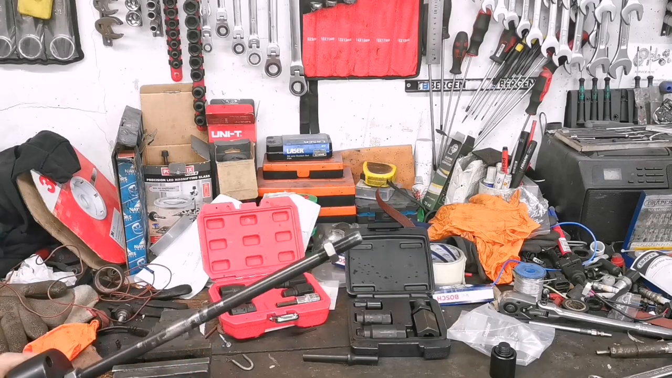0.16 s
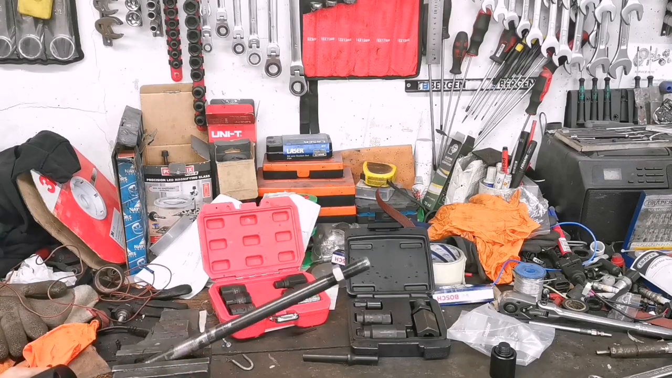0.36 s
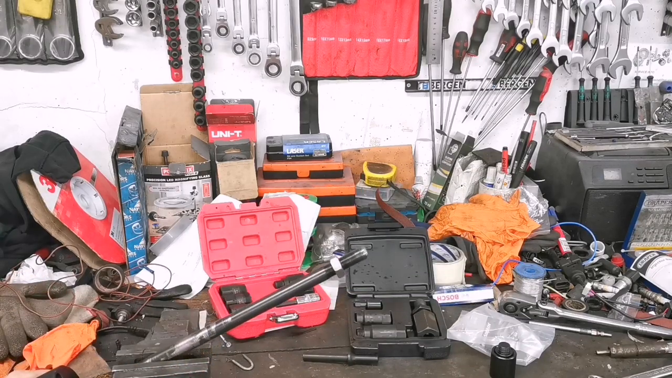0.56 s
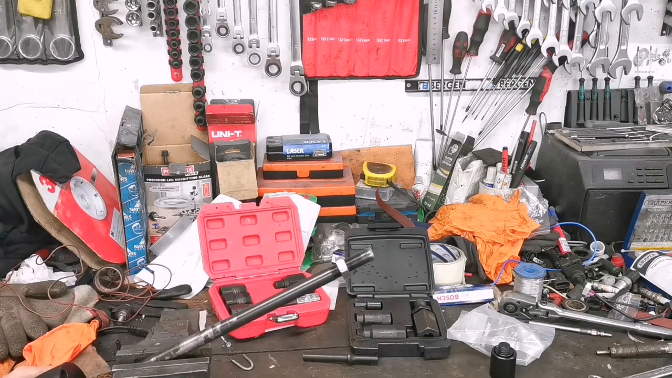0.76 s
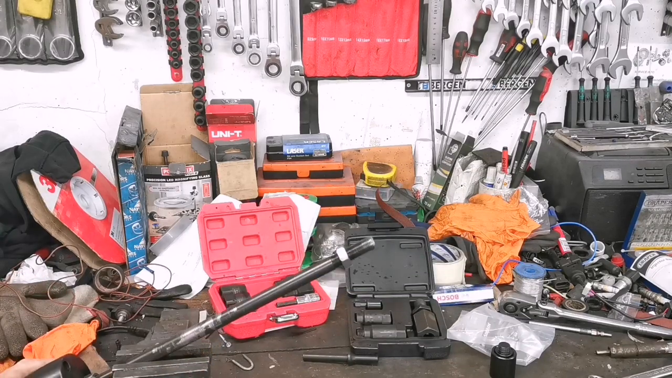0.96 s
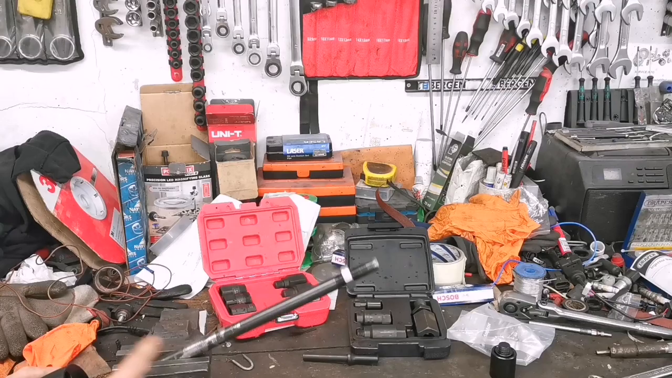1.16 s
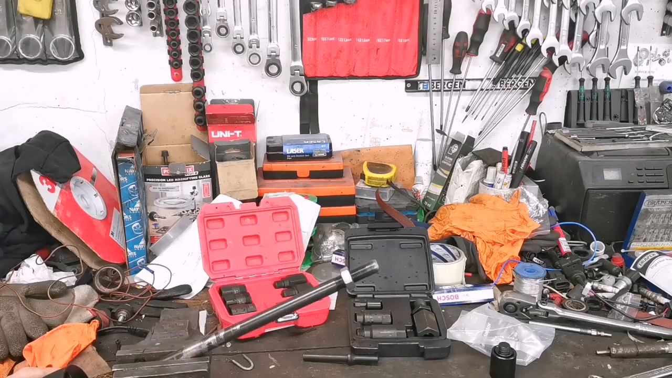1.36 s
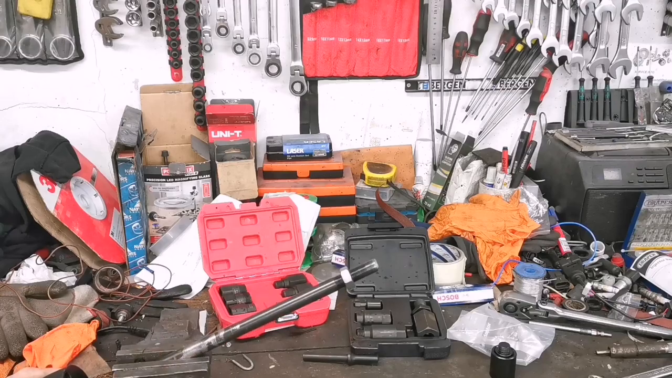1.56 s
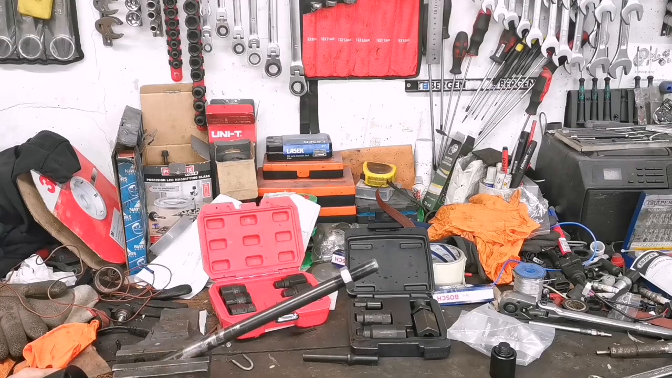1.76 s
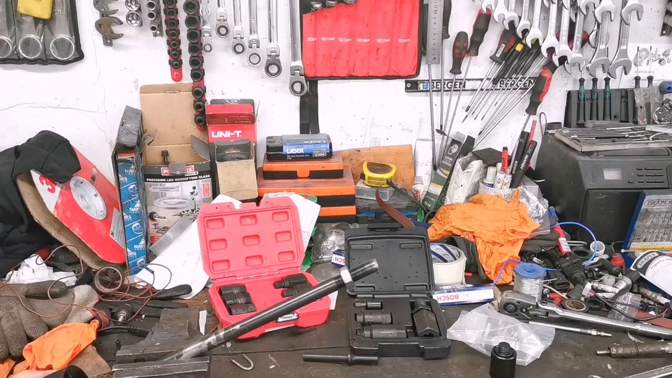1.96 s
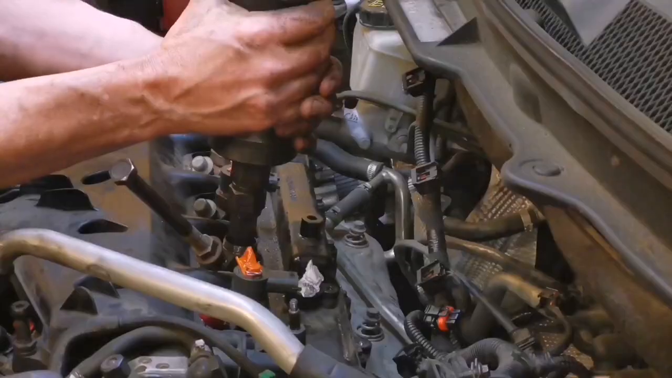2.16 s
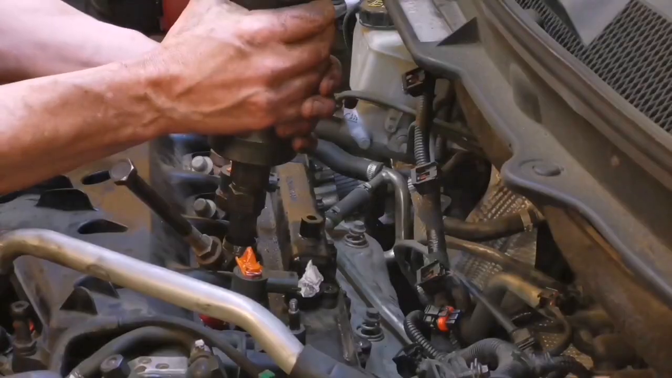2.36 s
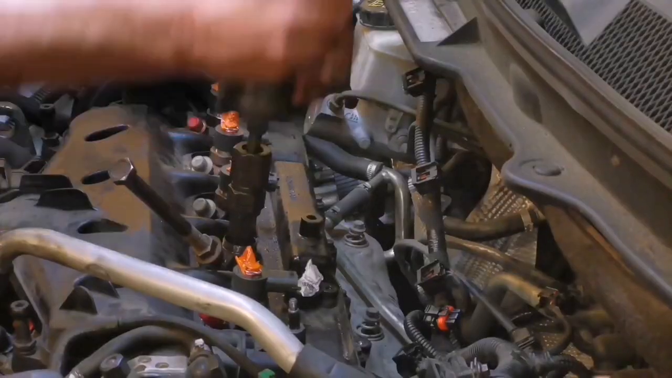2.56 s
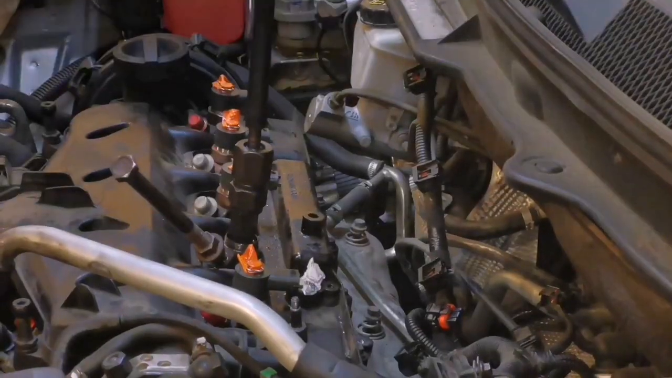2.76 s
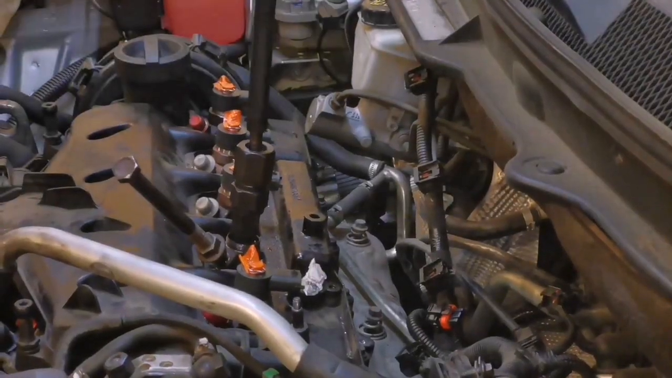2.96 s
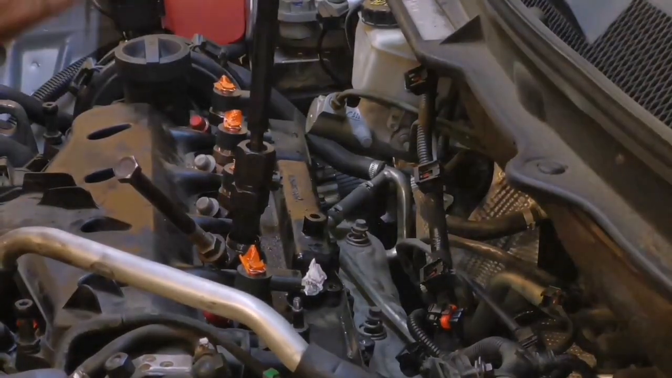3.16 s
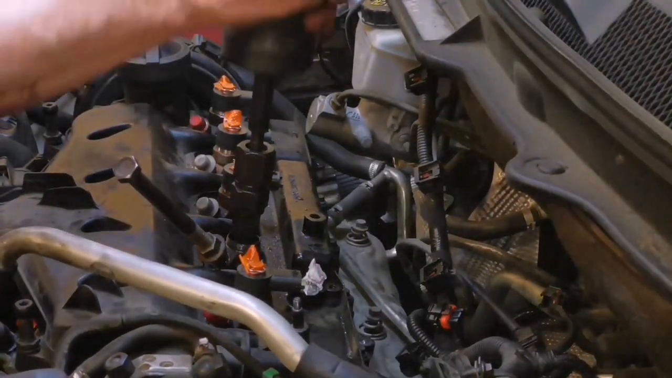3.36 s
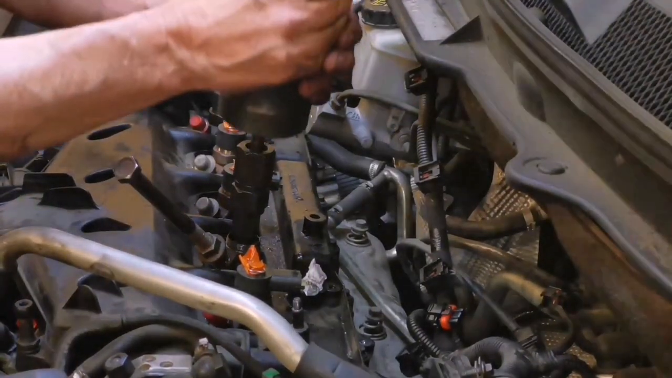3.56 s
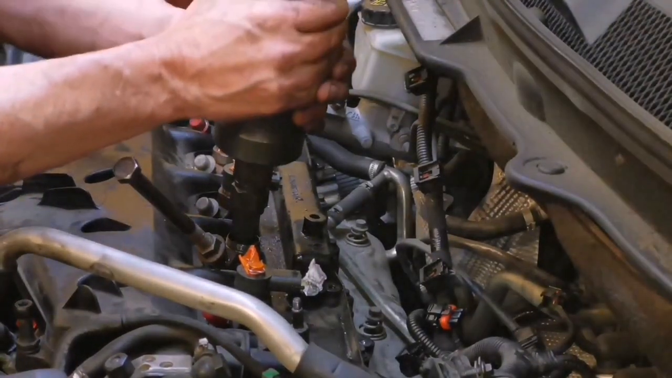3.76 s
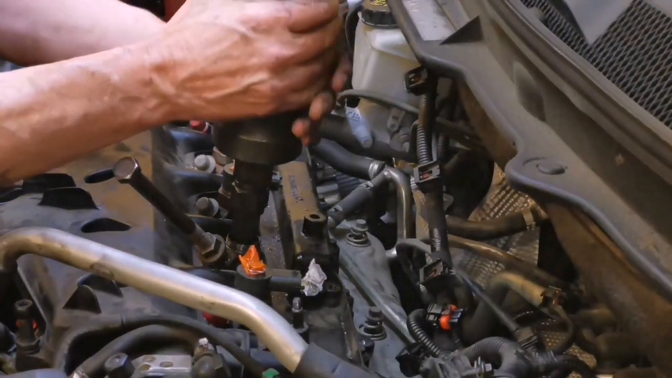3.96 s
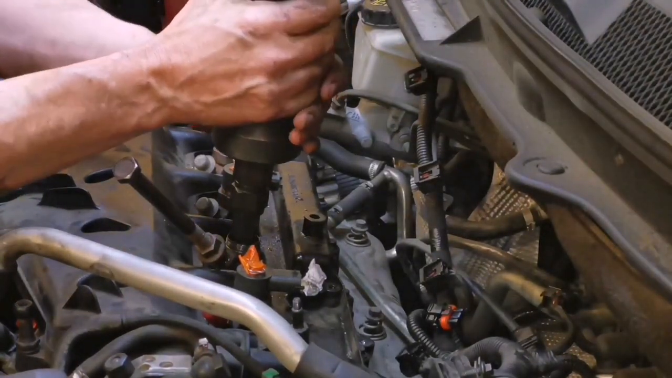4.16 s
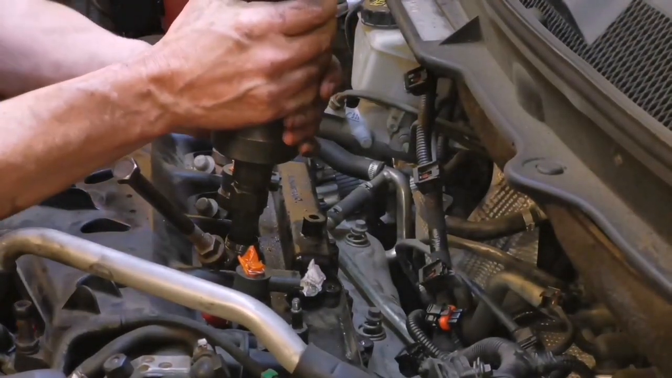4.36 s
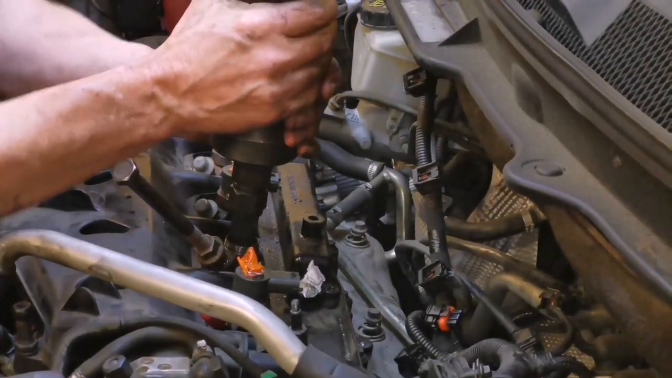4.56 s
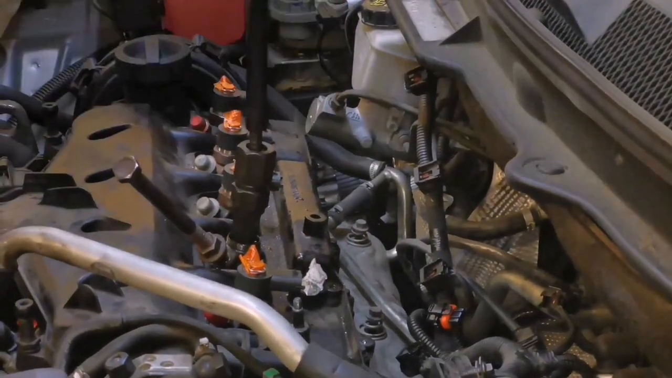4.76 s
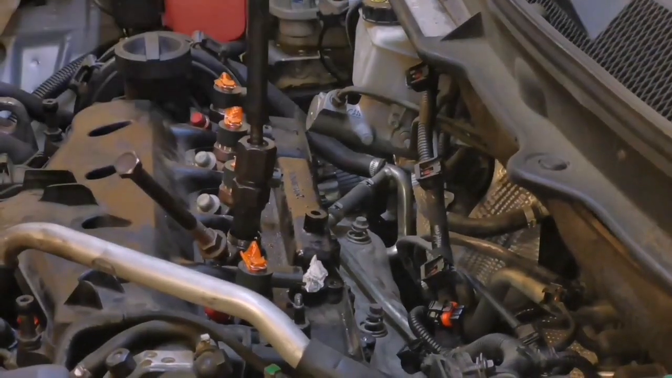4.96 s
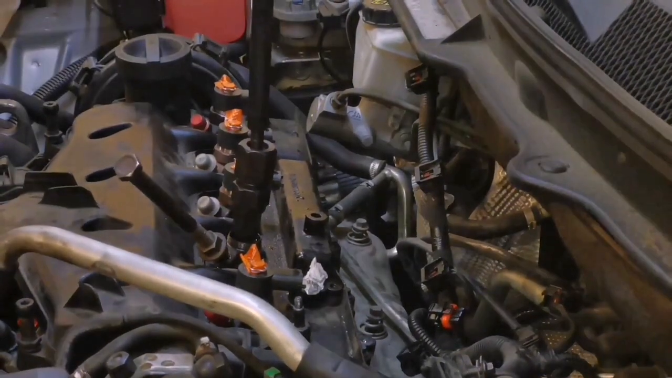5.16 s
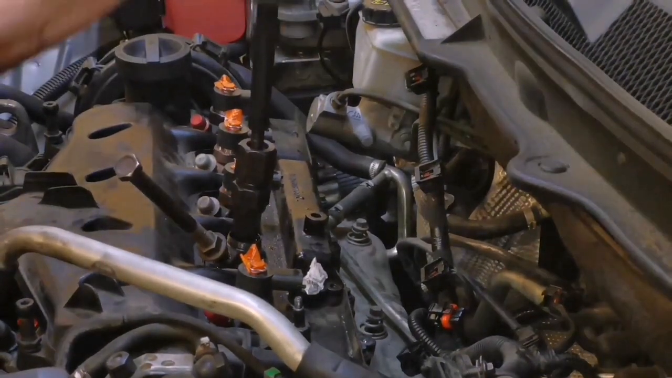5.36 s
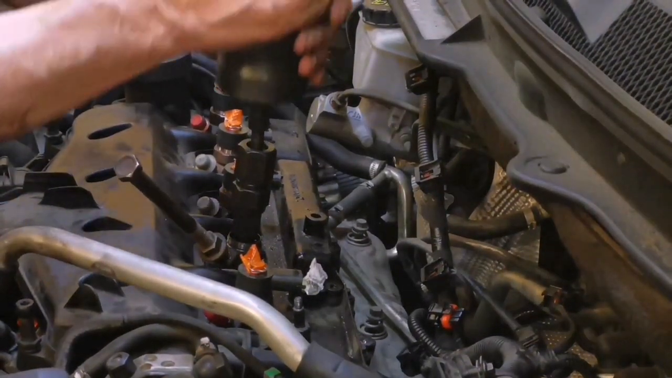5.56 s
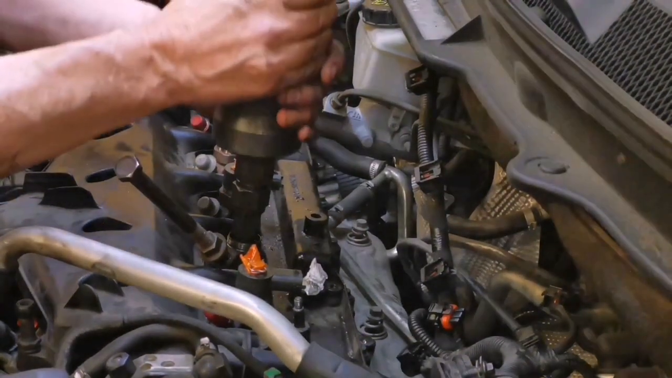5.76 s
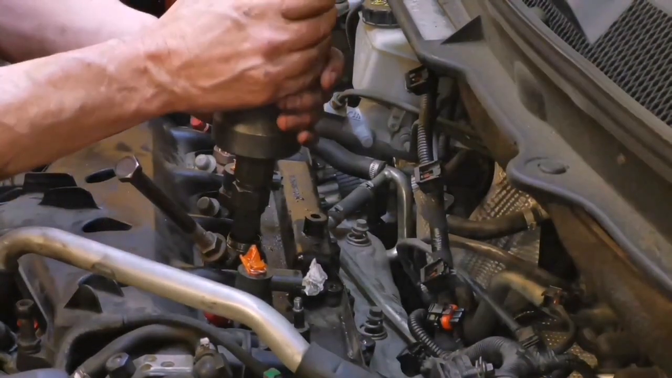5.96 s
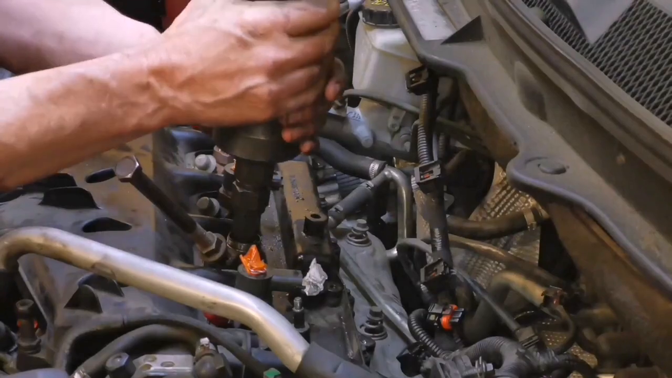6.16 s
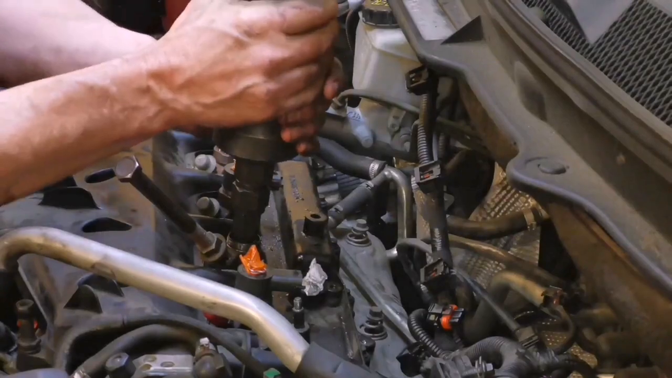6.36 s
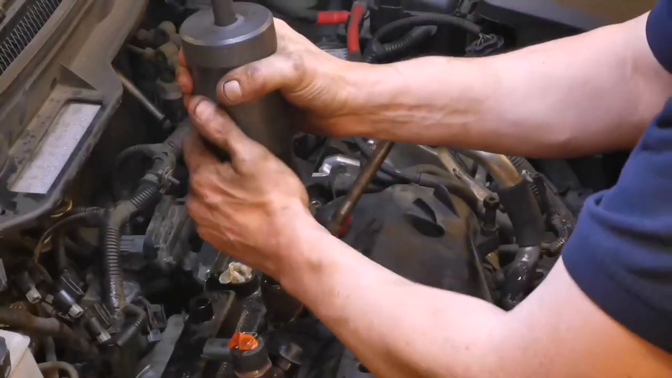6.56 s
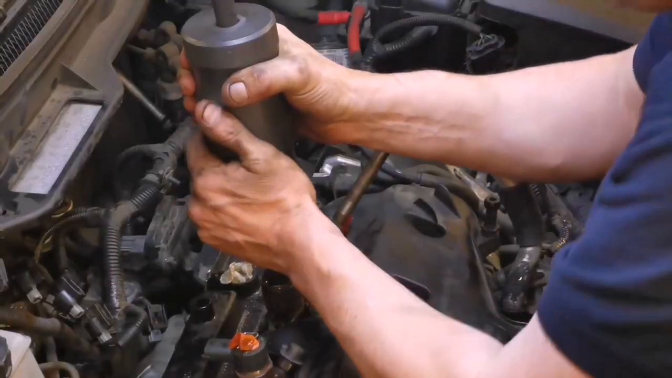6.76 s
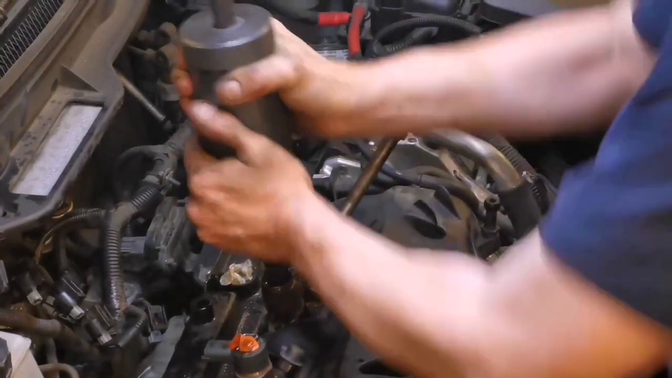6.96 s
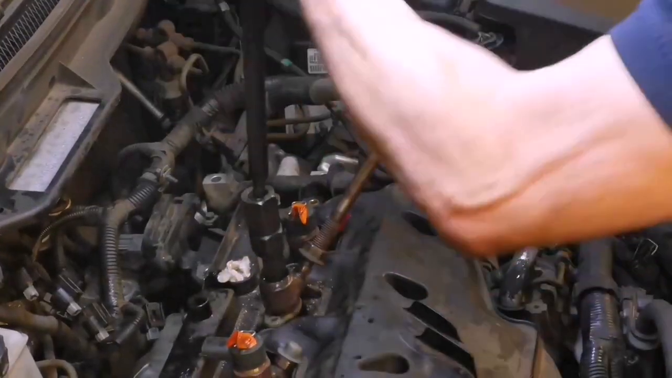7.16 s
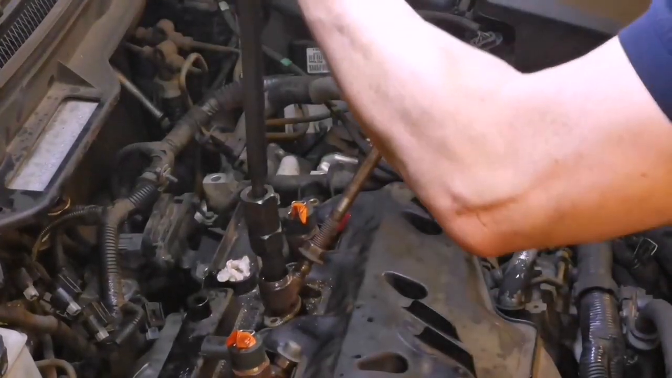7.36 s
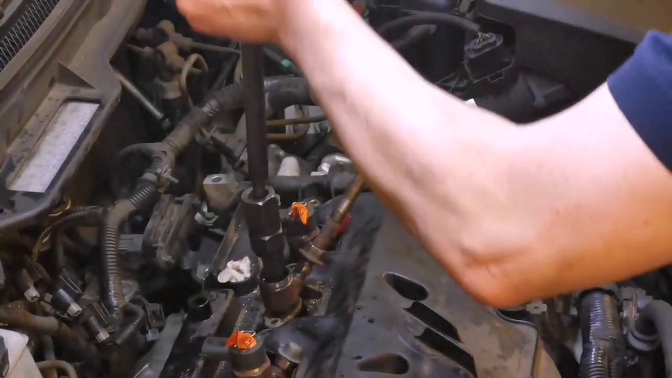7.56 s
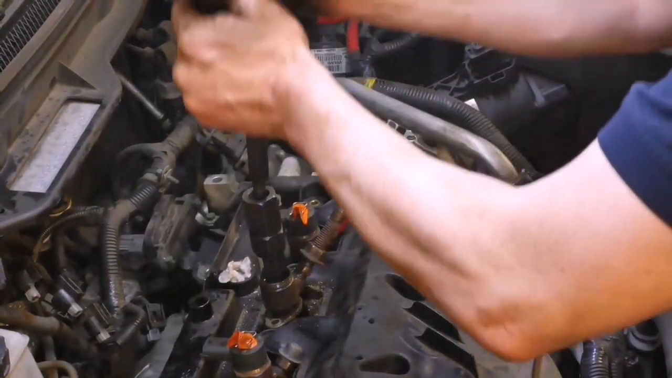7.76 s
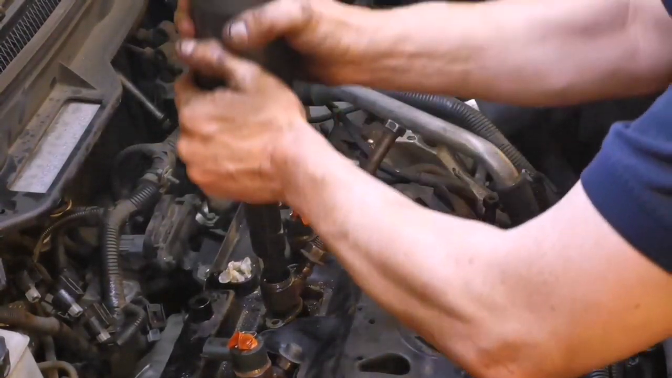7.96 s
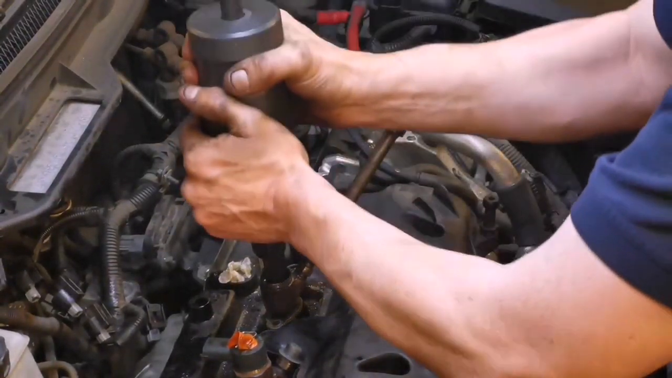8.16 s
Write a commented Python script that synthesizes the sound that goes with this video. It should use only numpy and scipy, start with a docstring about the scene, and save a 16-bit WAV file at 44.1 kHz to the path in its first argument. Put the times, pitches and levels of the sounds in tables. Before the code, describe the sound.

Steel tools thud and clink on a bench, then a slide hammer rattles up its rod and slams with three hard, overloading metallic clanks in a garage.

```python
"""A garage. First steel tools are put down and nudged on a cluttered bench; then, over an engine bay, a slide hammer's
weight rattles up its rod, slams into the top stop and is lowered onto the bottom stop, three times over.
Each contact is a short crash of noise plus decaying steel modes; sliding and shuffling are swelling, grainy noise.
The garage answers for about half a second over low rumble and room tone; the hardest blows overload the microphone."""
import sys
import numpy as np
from scipy import signal
from scipy.fft import rfft, irfft, next_fast_len
from scipy.io import wavfile
from scipy.ndimage import uniform_filter1d

SR = 44100
rng = np.random.default_rng(int(sys.argv[2]) if len(sys.argv) > 2 else 0)


def wav_record(signal):
    """Record a signal, one row per channel, as 16-bit PCM in the file named by sys.argv[1]."""
    frames = np.transpose(np.atleast_2d(signal))
    bounded = np.clip(frames, -1, 1)
    # unit amplitude maps onto the largest positive 16-bit level
    quanta = np.round(bounded * 32767).astype(np.int16)
    wavfile.write(sys.argv[1], SR, quanta)


N = 362061


def amp(db):
    """Level: decibels to linear gain."""
    return 10 ** (np.asarray(db) / 20)


def at_hz(points, hz):
    """Spectral envelope: a table interpolated over log frequency."""
    table_hz, values = np.array(points).T
    return np.interp(np.log(hz), np.log(table_hz), values)


def coloured(x, spectrum, low_hz, high_hz):
    """Spectral shaping: weights each bin of x by a spectrum in dB; the band from low to high gets rms 1."""
    hz = np.maximum(np.arange(len(x) // 2 + 1) * SR / len(x), 1)
    bins = rfft(x) * amp(spectrum(hz))
    in_band = (hz > low_hz) & (hz < high_hz)
    energy = np.sum(np.abs(bins[in_band]) ** 2)
    return irfft(bins, len(x)) * len(x) / np.sqrt(2 * energy)


def hiss(spectrum, low_hz, high_hz, grain_db=0.0):
    """Coloured noise: random samples, made grainy by their uneven sizes."""
    size = next_fast_len(N)
    sizes = amp(grain_db * np.minimum(rng.exponential(1, size), 6))
    noise = sizes * rng.standard_normal(size)
    return coloured(noise, lambda hz: at_hz(spectrum, hz), low_hz, high_hz)[:N]


def swells(rows, peak_at, sharp):
    """Amplitude envelope: every (start, length, dB) rises to its peak and fades as a power of a bent half sine."""
    gain = np.zeros(N)
    bend = np.log(.5) / np.log(peak_at)   # puts the top of the sine at peak_at
    for start_s, length_s, db in rows:
        at, share = round(start_s * SR), np.linspace(0, 1, round(length_s * SR))
        swell = np.abs(np.sin(np.pi * share ** bend)) ** sharp
        gain[at:at + len(share)] += amp(db) * swell[:N - at]
    return gain


def flutter(rate_hz, depth_db):
    """Random amplitude modulation: an uneven gain, as loose parts touch and let go."""
    r = np.exp(-2 * np.pi * rate_hz / SR)
    slow = signal.lfilter([1], [1, -2 * r, r * r], rng.standard_normal(N))
    return amp(depth_db * slow / np.std(slow))


def ring(clicks, hz, t60):
    """Damped resonator: a unit click sets a decaying sine of height 1 ringing."""
    r, w = amp(-60 / (t60 * SR)), 2 * np.pi * hz / SR
    return signal.lfilter([0, np.sin(w)], [1, -2 * r * np.cos(w), r * r], clicks + 1e-18)


def ringing(strikes, hz, t60, split):
    """Mode splitting: round steel rings in close pairs that beat; loosely held, it wavers, which blurs every tone."""
    at = np.array([sample for sample, _ in strikes])
    sizes = np.array([size for _, size in strikes])
    first, last = at.min(), min(N, at.max() + SR)
    halves = np.zeros((2, N))   # alternate modes waver separately
    for k in range(len(hz)):
        for twin in range(2):
            clicks = np.bincount(at - first, sizes[:, twin, k], last - first)
            tone = ring(clicks, hz[k] * (1 + split * twin), t60[k])
            halves[k % 2, first:last] += (-1) ** twin * tone
    return sum(flutter(41, 5.8) * half for half in halves)


def even_burst(fade):
    """Spectral flatness: a burst that follows the fade yet holds all pitches equally, like a shower of sharp impacts."""
    burst = fade * rng.standard_normal(len(fade))
    for _ in range(4):   # even out the spectrum, then the envelope, in turn
        bins = rfft(burst)
        flat = irfft(bins / (np.abs(bins) + 1e-12), len(fade))
        burst = fade * flat / np.sqrt(uniform_filter1d(flat ** 2, size=96) + 1e-20)
    return burst


BUMP_WIDTH = 0.0068     # the crash is louder around each mode: width as share of pitch
SHARE_SPREAD_DB = 3.5   # how differently each contact shares its energy among the modes


def contacts(events, crash, mode_db, mode_hz, shape):
    """Impact excitation: a crash of noise that dies fast and a strike on each mode, both coloured by how it lands."""
    out, strikes = np.zeros(N + 8192), []
    t = np.arange(8192) / SR
    usual = np.mean(events, axis=0)
    rise_s, t60, lift_db = shape
    fade = (1 - np.exp(-t / rise_s)) * np.exp(-np.log(1000) * t / t60)
    close = np.clip(2 - 2 * t / t.mean(), 0, 1)   # brings the tail to zero
    bin_hz = np.arange(len(t) // 2 + 1)[:, None] * SR / len(t)
    away = (bin_hz / mode_hz - 1) / BUMP_WIDTH
    for s, db, bass_db, presence_db, treble_db, ring_db in events:
        shares_db = mode_db + SHARE_SPREAD_DB * rng.standard_normal((2, len(mode_hz)))   # one row per twin
        bumps = (1 / (1 + away ** 2)) @ amp(shares_db[0] + lift_db) ** 2
        bumps_db = 10 * np.log10(1 + bumps)
        # departure from the usual contact of this kind
        tilt = [(250, bass_db - usual[2]), (1300, 0),
                (4600, presence_db - usual[3]), (10000, treble_db - usual[4])]
        burst = coloured(even_burst(fade), lambda hz: at_hz(crash, hz) + at_hz(tilt, hz) + bumps_db, 600, 2500)
        burst *= np.sqrt(np.mean(fade ** 2)) * close
        at = round(s * SR)
        out[at:at + len(t)] += amp(db - 2.5) * burst
        strength_db = db + ring_db + shares_db + at_hz(tilt, mode_hz)
        strikes.append((round((s + rise_s) * SR), amp(strength_db)))
    return out[:N], strikes


# weight against the top stop: [t/s, level/dB, then bass, presence, treble and ring re that level/dB]
BLOWS = [(2.704, -0.5, -26.5, 3.9, 4, -6), (4.8155, 0, -28, 1.9, 2, -6), (7.147, -16, -29, 3.9, 3.5, -8),
         (7.1515, -1.5, -27.5, 3.5, 4, -9.5)]
# weight knocking on the rod and the bottom stop: same columns
KNOCKS = [(2.501, -42, -12, -6.5, -12.5, -5.5), (2.524, -41.5, -12.5, -8, -8, -5),
          (2.541, -49, -13, -5.5, -7.5, -4.5), (2.567, -36.5, -17, -8.5, -10, -6),
          (2.612, -35, -28, -5.5, 1.5, -5.5), (3.129, -67, -5, -5.5, -9.5, 10),
          (3.752, -26, -3, -3, -9, -6), (4.049, -64, -10, -6.5, -14, -5), (4.239, -51.5, -17, 5, -0.5, -6),
          (4.637, -46, -12.5, 1.5, -3.5, 1), (4.673, -46.5, -14, -1, -3.5, -5.5),
          (4.709, -41, -13.5, -5, -5.5, -4), (4.729, -39, -13.5, -2.5, 0, -8),
          (4.762, -48, -15, 2, -3.5, -5), (5.715, -50, -17.5, -12, -24.5, 1),
          (5.819, -24.5, -7.5, -3.5, 0.5, -19.5), (6.139, -63.5, -7.5, -14.5, -19.5, -5),
          (6.29, -61, -16, -5.5, -12, -6), (6.312, -65, -15.5, -2, -7.5, -5),
          (6.337, -40.5, -12.5, -6.5, -6, -4), (6.541, -48.5, -5, -21, -23.5, -7),
          (6.947, -45.5, -21.5, 9, -2, -11), (6.984, -47.5, -13, 2.5, -3.5, -2.5),
          (7.004, -40, -16, 7, -2, -7), (7.042, -34.5, -13.5, 2.5, -0.5, -4.5),
          (8.097, -57.5, -10, -9, -15.5, 1.5), (8.18, -20.5, -12.5, -3.5, -3.5, -3)]
# modes of hammer, rod and engine: [f/Hz, level from a blow/dB, level from a knock/dB, t60/s]
HAMMER_MODES = [(158, -51.5, -45, 0.99), (277, -47.5, -41, 0.54), (403.7, -20.5, -15, 0.19),
                (484, -28.5, -19, 0.15), (692.5, -39.5, -28, 0.37), (1009, -15.5, -29, 0.16),
                (1620, -26.5, -29.5, 0.13), (1756, -20, -30.5, 0.12), (1950, -26, -31, 0.14),
                (2140, -35.5, -17.5, 0.15), (2340, -33, -20, 0.13), (3240, -29, -32, 0.045),
                (3340, -30.5, -33, 0.079), (4350, -25.5, -24.5, 0.36), (4743, -21, -27.5, 0.15),
                (5287, -30.5, -35.5, 0.071), (6000, -30, -21.5, .22), (6070, -67, -43, 0.7),
                (6450, -25, -31, 0.047), (8145, -59.5, -50, 0.8), (8760, -27.5, -17, 0.22),
                (8465, -21.5, -29, 0.063), (9680, -20, -30.5, 0.17), (10040, -19.5, -28, .13),
                (9602, -32, -22, 0.081), (13280, -26.5, -30, .05)]
# spectrum of a blow's crash: [f/Hz, level per Hz/dB]
BLOW_CRASH = [(18, -49.5), (30, -19), (329, -5), (619, -16.5), (995, -3.5), (1260, -7), (3000, -2),
              (3810, -4.5), (4340, -3.5), (6450, -3), (8390, -0.5), (11200, -9.5), (13800, -6),
              (16200, -24.5)]
# spectrum of a knock's crash: [f/Hz, level per Hz/dB]
KNOCK_CRASH = [(29, -54), (50, -23.5), (398, -2.5), (1210, -6), (1360, -6), (1700, -7), (5950, -7),
               (6870, -13), (8340, -9.5), (12000, -28), (13500, -19.5), (16000, -41.5)]
# crash: (rise s, t60 s, lift around the modes re mode dB)
BLOW_SHAPE, KNOCK_SHAPE = (.0008, 0.04, 26.05), (0.0018, .044, 27)
HAMMER_SPLIT = 0.01   # detune of each mode's twin, share of its pitch


def hammer():
    """Modal excitation: full strikes on the top stop and light knocks ring the same steel with other shares."""
    hz, blow_db, knock_db, t60 = np.transpose(HAMMER_MODES)
    slam, hard = contacts(BLOWS, BLOW_CRASH, blow_db, hz, BLOW_SHAPE)
    knocks, light = contacts(KNOCKS, KNOCK_CRASH, knock_db, hz, KNOCK_SHAPE)
    return slam + knocks + ringing(hard + light, hz, t60, HAMMER_SPLIT)


def side_noise(steel):
    """Decorrelation: treble noise of opposite sign left and right, its level following the loudness of the steel."""
    loudness = signal.lfilter([.01], [1, -.99], steel ** 2)
    highpass = signal.butter(4, 4000, "high", fs=SR, output="sos")
    treble = signal.sosfilt(highpass, rng.standard_normal(N))
    return amp(-13) * loudness / (loudness + 0.25) * treble * [[1], [-1]]


# weight sliding on the rod: [start t/s, length t/s, level before the mix/dB, top treble re that level/dB]
SLIDES = [(2.492, 0.43, -50.5, -3.5), (4.617, 0.25, -44.5, -8), (5.71, 0.075, -80, -18),
          (6.018, .13, -69, -3.5), (6.964, 0.17, -37, -2.5), (7.798, .29, -76, -5.5)]
# spectrum of the sliding body: [f/Hz, level per Hz/dB]
SLIDE = [(59, -51.5), (100, -13), (296, -6), (341, 1), (478, -14.5), (719, 0), (1120, -6.5), (1850, -2.5),
         (7000, -7), (9100, -36), (15400, -120)]
SLIDE_PEAK_AT, SLIDE_SHARP = 0.48, 2.1   # share of the stroke at top speed; how pointed the swell is


def slide():
    """Friction excitation: the loose bore chatters on the rod, gritty noise that also stirs the modes."""
    body_rows = [row[:3] for row in SLIDES]
    sheen_rows = [(s, length, db + treble_db) for s, length, db, treble_db in SLIDES]
    sheen_colour = [(5500, -38.0), (7000, 0), (8700, 7.0), (11000, -12.0), (16000, -18.5)]   # Hz, dB
    chatter = flutter(35, 3.0)
    body = chatter * swells(body_rows, SLIDE_PEAK_AT, SLIDE_SHARP)
    sheen = chatter * swells(sheen_rows, SLIDE_PEAK_AT, SLIDE_SHARP)
    grit = body * hiss(SLIDE, 600, 10000, grain_db=6.5)
    grit += sheen * hiss(sheen_colour, 5200, 15000, grain_db=10.0)
    stirred = sum(amp(db) * ring(grit, hz, t60) for hz, _, db, t60 in HAMMER_MODES)
    return grit + amp(-34.5) * stirred


# the free rod pings sideways: [t/s, level/dB]
PINGS = [(2.574, -44), (2.625, -42.5), (2.93, -47), (3.2, -70), (3.271, -72), (3.4, -76), (3.551, -71.5),
         (3.751, -38), (4.74, -49.5), (5.716, -55.5), (5.818, -35)]
PING_HZ, PING_T60_S = 1332, 0.12


def pings():
    """Beats: two decaying tones 12 Hz apart, struck softly."""
    times_s, levels_db = np.transpose(PINGS)
    strikes = np.zeros(N)
    strikes[[round(s * SR) for s in times_s]] = amp(levels_db)
    pair = ring(strikes, PING_HZ, PING_T60_S) + 0.3 * ring(strikes, PING_HZ + 12, PING_T60_S)
    return flutter(25, 3.0) * pair


# dull thuds on the bench: [t/s, level/dB, then bass, presence, treble and ring re that level/dB]
THUDS = [(0.002, -15, -19, -16, -45, -29), (0.009, -14.5, -25, -28.5, -50, -31),
         (0.157, -22.5, -6, -9.5, -20.5, -19), (0.165, -16.5, -17, -30, -38, -9.5),
         (0.206, -24, -14.5, -14, -36.5, -4), (0.272, -31.5, -18, -11, -26.5, -22),
         (0.312, -35.5, -11.5, -14, -38, -5), (0.803, -49, -1, -17.5, -25.5, -5.5),
         (1.117, -27.5, -21, -20.5, -36.5, -4.5), (1.126, -29, -10, -21, -34, -6),
         (1.158, -29, -13.5, -28, -40, -30), (1.174, -26.5, -15.5, -26, -36.5, -19),
         (1.739, -55.5, -2, -4.5, -16, -19), (1.794, -66, -7.5, -7.5, -12, -14)]
# steel tools clinking together: same columns
CLINKS = [(0.486, -35, -14, 6, -19, -15.5), (0.559, -42.5, -7.5, -4.5, -15.5, -22),
          (0.759, -62, -20, -6, -9.5, 0), (0.870, -21.5, -23.5, 6, 9.5, -24.5),
          (0.908, -21, -17, -24.5, -10.5, -9.5), (0.919, -15, -10, 1.5, -23, -15.5),
          (1.329, -51.5, -33, -3, -9, -14)]
# modes of bench top and tools: [f/Hz, level from a thud/dB, level from a clink/dB, t60/s]
BENCH_MODES = [(135, -5.5, -44, 0.36), (367, -0.5, -37, 0.046), (510, -16.5, -24.5, 0.11),
               (728, -17, -5.5, .09), (1153, -14, -17.5, 0.15), (1852, -24.5, -22.5, 0.083),
               (1995, -21.5, -19, 0.2), (2886, -27, -18, 0.092), (4920, -47.5, -20.5, 0.49),
               (5030, -53, -17, 0.24), (6900, -33, -27.5, 0.11), (8640, -59, -26.5, 0.12),
               (8800, -52.5, -22.5, 0.091), (9400, -51.5, -13.5, 0.24), (10600, -58.5, -15, 0.19),
               (15200, -53, -7, 0.054)]
# spectrum of a thud's crash: [f/Hz, level per Hz/dB]
THUD_CRASH = [(35, -47), (60, -17), (157, -5.5), (419, -8), (543, -5), (1290, -10.5), (1520, -17.5),
              (2060, -13), (2210, -16.5), (6970, -38), (16200, -57)]
# spectrum of a clink's crash: [f/Hz, level per Hz/dB]
CLINK_CRASH = [(59, -47), (100, -16), (2100, 1.5), (8020, -19.5), (9510, -15), (16200, -45.5)]
# crash: (rise s, t60 s, lift around the modes re mode dB)
THUD_SHAPE, CLINK_SHAPE = (.002, 0.046, 15), (0.00056, 0.065, 23)
BENCH_SPLIT = 0.0043   # detune of each mode's twin, share of its pitch


def bench():
    """Modal excitation: thuds wake the bench top, clinks the tools."""
    hz, thud_db, clink_db, t60 = np.transpose(BENCH_MODES)
    thuds, dull = contacts(THUDS, THUD_CRASH, thud_db, hz, THUD_SHAPE)
    clinks, bright = contacts(CLINKS, CLINK_CRASH, clink_db, hz, CLINK_SHAPE)
    return thuds + clinks + ringing(dull + bright, hz, t60, BENCH_SPLIT)


# things shuffling on the bench, hands and sleeves at the engine: [start t/s, length t/s, level before the mix/dB]
SHUFFLE = [(0.3, 0.5, -54), (0.58, 0.16, -57), (0.72, 0.48, -50.5), (1.09, 0.075, -43.5),
           (1.15, .35, -52.5), (1.5, 0.44, -65), (1.82, 0.55, -70), (2.115, 0.15, -67.5),
           (2.26, 0.15, -64.5), (4.28, 0.094, -74.5), (5.38, 0.15, -87.5), (5.62, 0.071, -75),
           (6.08, 0.082, -70.5), (6.28, 0.12, -64), (6.34, 0.089, -48), (6.54, 0.1, -60.5),
           (6.66, 0.22, -63.5)]
# spectrum of the shuffling: [f/Hz, level per Hz/dB]
SHUFFLE_COLOUR = [(47, -34.5), (80, -7.5), (374, -4), (455, -3), (761, -7), (1150, -8), (1460, -14),
                  (2040, -10.5), (9000, -34), (11700, -68), (19800, -120)]


def shuffle():
    """Friction noise: each movement is a swell of grainy, fluttering noise."""
    gain = swells(SHUFFLE, peak_at=0.29, sharp=1.4)
    return gain * flutter(26, 1.3) * hiss(SHUFFLE_COLOUR, 260, 4000, grain_db=5.5)


# faint narrow scrapes: [start t/s, length t/s, level/dB, f/Hz]
SCRAPES = [(2.04, 0.061, -67, 1970), (2.124, 0.083, -71, 1860), (5.422, 0.09, -74, 2250),
           (6.701, 0.13, -73.5, 2805), (6.78, 0.056, -72.5, 1452), (7.878, 0.11, -80.5, 2200)]
SCRAPE_WIDTH_HZ = 150


def scrapes():
    """Bandpass resonance: noise through one narrow resonance each."""
    out, white = 0, rng.standard_normal(N)
    r = np.exp(-np.pi * SCRAPE_WIDTH_HZ / SR)
    for s, length, db, hz in SCRAPES:
        tone = signal.lfilter([1, 0, -1], [1, -2 * r * np.cos(2 * np.pi * hz / SR), r * r], white)
        out = out + swells([(s, length, db)], .4, 0.8) * tone / np.std(tone)
    return out


# a thin, bright rustle on the bench: [start t/s, length t/s, level/dB]
RUSTLE = [(0.68, 0.11, -97), (0.8, .07, -78), (1.19, 0.15, -63)]


def rustle():
    """Friction noise: swells of grainy treble."""
    gain = swells(RUSTLE, peak_at=.6, sharp=0.84)
    return gain * hiss([(4000, -27.5), (7000, 0.5), (16000, 5)], 7000, 17000, grain_db=6.5)


# low rumble that swells and fades: [start t/s, length t/s, upper level/dB, deep level/dB]
RUMBLE = [(0.05, 0.69, -58, -93), (0.434, 0.37, -57, -110), (1.114, 0.52, -51, -102), (1.8, .3, -82, -77),
          (2.45, 0.36, -73, -67.5), (2.944, 0.69, -62, -66), (3.3, .95, -81.5, -82),
          (4.302, 0.42, -66.5, -80), (4.66, 0.22, -67, -63.5), (4.935, 0.15, -57, -57),
          (5.059, 0.58, -60.5, -65), (5.414, 0.61, -91, -65), (6.148, 0.19, -77, -80),
          (6.917, 0.21, -70, -70), (7.301, 0.35, -71, -83)]
# hard contacts shake bench or car body: [t/s, upper level/dB, deep level/dB], before the onset is smoothed
THUMPS = [(0.0, -33.5, -76), (2.704, -45.5, -52.5), (3.752, -61, -69), (4.815, -35, -41.5),
          (5.819, -58, -80), (7.15, -49, -48), (8.18, -68, -83)]
THUMP_T60_S, THUMP_RISE_S = 0.18, 0.0082
UPPER_BED_DB, DEEP_BED_DB = -86.5, -97


def rumble():
    """Low-frequency noise: two layers, each a steady bed with swells and exponentially dying thumps."""
    upper_colour = [(20, -79.5), (34, -44), (50, -1.5), (68, 3.5), (110, -10.0), (200, -43.5), (500, -110)]
    deep_colour = [(10, -19.0), (20, -1.5), (38, -4), (60, -32.0), (200, -110)]
    upper = hiss(upper_colour, 45, 150)
    deep = hiss(deep_colour, 13, 42)
    thump_at = [round(row[0] * SR) for row in THUMPS]
    out = 0
    for k, (noise, bed_db) in enumerate([(upper, UPPER_BED_DB), (deep, DEEP_BED_DB)]):
        kicks = np.bincount(thump_at, [amp(row[k + 1]) for row in THUMPS], N)
        thumps = signal.lfilter([1], [1, -amp(-60 / (THUMP_T60_S * SR))], kicks + 1e-18)
        thumps = uniform_filter1d(thumps, size=round(THUMP_RISE_S * SR) + 1)
        swell = swells([(*row[:2], row[k + 2]) for row in RUMBLE], peak_at=0.16, sharp=4.2)
        out = out + (amp(bed_db) + swell + thumps) * noise
    return out


# spectrum of the room tone: [f/Hz, level per Hz/dB]
QUIET = [(59, -35), (100, -2.5), (1150, -12), (1360, -13.5), (3780, -17.5), (8280, -20), (16000, -29.5)]
QUIET_DB = -73.5


def room_tone():
    """Stationary noise: the steady background of the room."""
    return amp(QUIET_DB) * hiss(QUIET, 150, 16000)


EARLY_HISS_DB, EARLY_HISS_END_S = -74, 2.105


def early_hiss():
    """Gated noise: a faint, steady treble hiss that stops at 2.105 s."""
    on = np.arange(N) < EARLY_HISS_END_S * SR
    return amp(EARLY_HISS_DB) * on * hiss([(1500, -0.5), (5000, -5), (16000, -7.5)], 6000, 20000)


# reverberation time of the garage: [f/Hz, t60/s]
GARAGE_T60 = [(60, 0.076), (150, 0.59), (400, 0.43), (1500, 0.47), (4000, 0.46), (7000, .41), (9000, 0.39),
              (11200, 0.32), (13500, 0.15), (16000, 0.18)]
GARAGE_DB = -5.5


def garage(x):
    """Reverberation: convolution with dense echoes that die band by band."""
    t = np.arange(SR) / SR
    edges = np.geomspace(25, 20000, 64).astype(int)
    white, echoes = rfft(rng.standard_normal(SR)), 0
    for low, high in zip(edges, edges[1:]):
        band = np.zeros_like(white)
        band[low:high] = white[low:high]   # one bin a hertz
        t60 = at_hz(GARAGE_T60, np.sqrt(low * high))
        echoes = echoes + irfft(band, SR) * np.exp(-np.log(1000) * t / t60)
    echoes = echoes * np.clip(t / 0.0025, 0, 1)   # the echoes build up over 2.5 ms
    echoes /= np.sqrt(np.sum(echoes ** 2))
    return amp(GARAGE_DB) * signal.fftconvolve(x, echoes)[:N]


def scene():
    """Superposition: steel and small sounds with their reverberation, over rumble, rustle, hiss and room tone."""
    steel = hammer()
    small = bench() + pings() + scrapes() + amp(-6.0) * slide() + amp(-6) * shuffle()
    highpass = signal.butter(2, 95, "high", fs=SR, output="sos")
    near = signal.sosfilt(highpass, steel + small)
    floor = rumble() + rustle() + room_tone() + early_hiss()
    return near + garage(near) + floor + side_noise(steel)


CUTOFF_HZ = 16500


def record(dry):
    """Saturation and band limiting: the hardest peaks of the centre are flattened, the top is cut."""
    mid = dry.mean(axis=0)
    side = dry - mid
    flat = side + mid / (1 + np.abs(mid / .8) ** 6) ** (1 / 6)
    lowpass = signal.cheby2(14, 70, CUTOFF_HZ, fs=SR, output="sos")
    return np.clip(signal.sosfilt(lowpass, flat), -1, 1)


dry = scene()
out = record(dry)
wav_record(out)
```